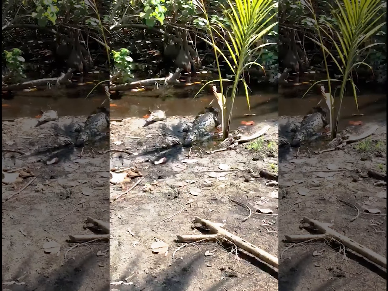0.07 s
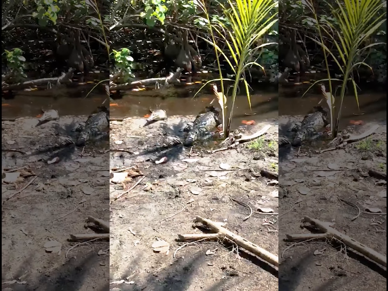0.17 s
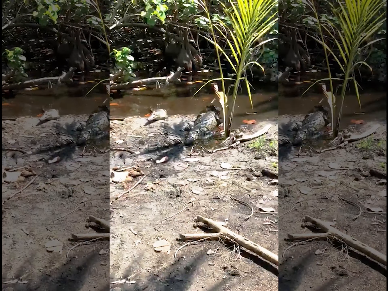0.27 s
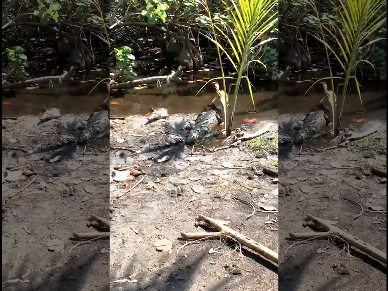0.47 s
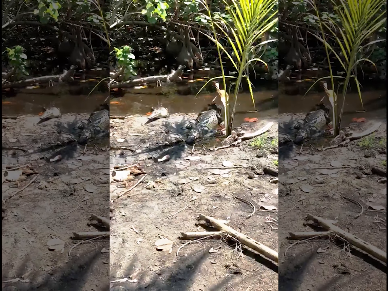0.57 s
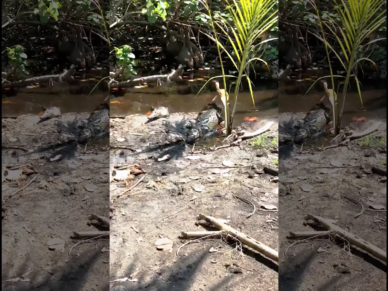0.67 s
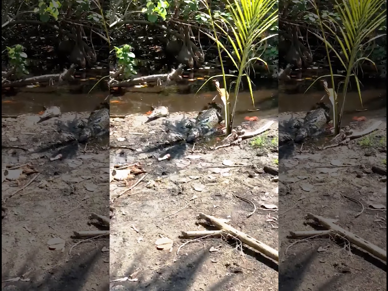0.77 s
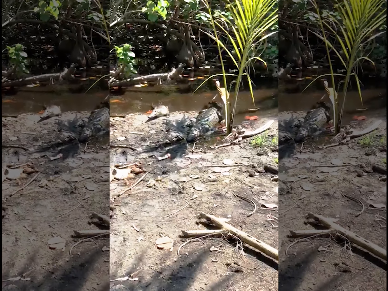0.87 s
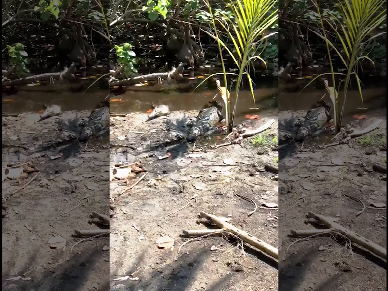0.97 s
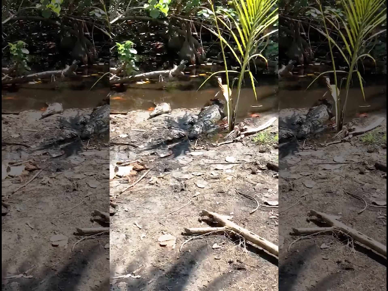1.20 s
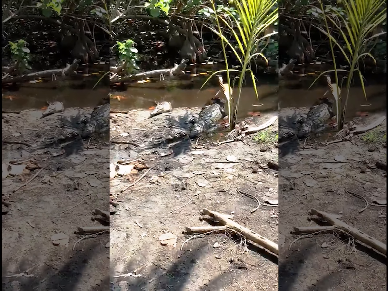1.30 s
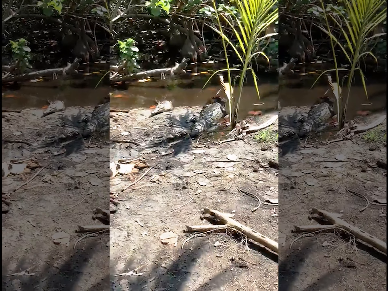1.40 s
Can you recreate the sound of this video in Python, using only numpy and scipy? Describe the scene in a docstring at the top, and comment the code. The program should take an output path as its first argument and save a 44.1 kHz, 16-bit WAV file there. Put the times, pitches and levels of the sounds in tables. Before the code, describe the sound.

A bird whistles two groups of short falling notes over faint leaf rustle and forest hiss.

```python
"""A bird by a forest creek

On a muddy creek bank a bird whistles two groups of four short falling notes; the trees answer faintly.
Between the groups comes one sharp chip, and farther off a thin, slowly sinking tone, perhaps an insect.
Dry leaves rustle once and crackle twice over a low outdoor rumble and a soft hiss."""
import sys
import numpy as np
from scipy import signal
from scipy.fft import rfft, irfft, next_fast_len
from scipy.io import wavfile
from scipy.ndimage import map_coordinates

SR = 44100
rng = np.random.default_rng(int(sys.argv[2]) if len(sys.argv) > 2 else 0)


def file_out(sig):
    """Save sig as 16-bit WAV at sys.argv[1]."""
    # one column per channel
    cols = np.atleast_2d(sig).T
    # limit, then scale
    lim = np.clip(cols, -1, 1)
    pcm = np.round(lim * 32767).astype(np.int16)
    wavfile.write(sys.argv[1], SR, pcm)


N = 63945
TIME_S = np.arange(N) / SR


def amp(db):
    """Turn decibels into a number to multiply by."""
    return 10 ** (np.asarray(db) / 20)


def unit(x):
    """Scale a sound so that its average power is 1."""
    return x / np.sqrt(np.mean(x ** 2) + 1e-20)


def value_at(points, hz):
    """Read between the rows of a frequency table, with octaves evenly spaced."""
    row_hz, values = np.transpose(points)
    return np.interp(np.log(hz + 1), np.log(row_hz + 1), values)


def curves(rows):
    """Join the rows of a time table with straight lines, one curve for each later column."""
    times, *columns = np.transpose(rows)
    return [np.interp(TIME_S, times, column) for column in columns]


def wobble(rate):
    """A smooth curve through `rate` random values a second."""
    values = rng.standard_normal(int(N * rate / SR) + 4)
    return map_coordinates(values, [TIME_S * rate])


def filtered(x, gain_at):
    """Make each frequency louder or softer by gain_at(hz)."""
    size = next_fast_len(N + SR // 2)
    return irfft(rfft(x, size) * gain_at(np.fft.rfftfreq(size, 1 / SR)), size)[:N]


def coloured(x, spectrum):
    """Give a sound a balance of bass and treble, at average power 1."""
    return unit(filtered(x, lambda hz: amp(value_at(spectrum, hz))))


def delayed(x, seconds):
    """The same sound arriving later."""
    return np.interp(TIME_S - seconds, TIME_S, x, left=0)


# How strong the rumble is from low to high: frequency_hz, relative_level_db
RUMBLE_SPECTRUM = [(12, -46), (20, -31), (57, 0), (113, 0), (163, -2.5), (263, -11.5), (393, -16),
                   (503, -18), (707, -22.5), (800, -42), (1040, -33), (1760, -120)]
# How strong the hiss is from low to high: frequency_hz, relative_level_db
HISS_SPECTRUM = [(350, -22), (600, -2), (900, -1), (1300, -0.5), (1900, -6), (2900, -4), (4200, -8),
                 (7000, -15), (10500, -18.5), (12000, -21)]

def forest_air(rumble_db=-53, easing_db_per_s=2, hiss_db=-62.5):
    """A low outdoor rumble that eases slightly, and the even hiss of the forest."""
    eased_db = easing_db_per_s * (TIME_S - N / SR / 2)
    rumble = amp(rumble_db - eased_db) * coloured(rng.standard_normal(N), RUMBLE_SPECTRUM)
    hiss = amp(hiss_db) * coloured(rng.standard_normal(N), HISS_SPECTRUM)
    return rumble + hiss


# How the rustle grows and fades: time_s, level_db
RUSTLE_LOUDNESS = [(0, -74), (.17, -64.5), (.21, -60), (.26, -64), (.335, -63.5), (.385, -56.5), (.44, -62),
                   (.468, -51), (.495, -47.5), (.512, -52), (.555, -54.5), (.605, -60), (.65, -56.5),
                   (.70, -61.5), (.76, -59.5), (.81, -64.5), (1.15, -67), (1.4, -69)]
# How strong the rustle is from low to high: frequency_hz, relative_level_db
RUSTLE_SPECTRUM = [(200, -11), (700, -6), (1800, 1.5), (4000, -1), (6600, -0.5), (8000, -3), (10500, -3.5),
                   (12000, -13.5)]

def leaf_rustle(ticks_per_s=1300, tick_db=-5.5, flicker_db=1.2):
    """Dry leaves slide: a swish with tiny ticks in it."""
    level_db, = curves(RUSTLE_LOUDNESS)
    ticks = unit((rng.random(N) < ticks_per_s / SR) * rng.standard_normal(N))
    loudness = amp(level_db + flicker_db * wobble(120))
    swish = rng.standard_normal(N) + amp(tick_db) * ticks
    return loudness * coloured(swish, RUSTLE_SPECTRUM)


# Single leaves snapping: start_s, level_db, centre_hz
LEAF_SNAPS = [(.636, -55, 2600), (.754, -55, 3100)]

def leaf_crackles(fade_s=.03, width_octaves=.6):
    """Single dry leaves snap softly as the rustle dies down, each a tiny burst of noise."""
    out = np.zeros(N)
    for start, db, centre_hz in LEAF_SNAPS:
        noise = filtered(rng.standard_normal(N),
                         lambda hz: 1 / (1 + (np.log2((hz + 1) / centre_hz) / width_octaves) ** 2))
        loudness = (TIME_S > start) * amp(db - 60 * np.abs(TIME_S - start) / fade_s)
        out += loudness * unit(noise)
    return out


# How long the forest's echo takes to fade by 60 dB: frequency_hz, fade_s
ECHO_FADE_TIMES = [(500, 0.58), (1200, 0.36), (3500, 0.35), (10000, 0.28)]

def forest_echo(x, build_s=.03):
    """Many trees send back one blurred echo; its treble dies sooner."""
    hz, t, noise = signal.stft(rng.standard_normal(SR), SR, nperseg=256)
    fade = amp(-60 * t / value_at(ECHO_FADE_TIMES, hz)[:, None])
    build_up = 1 - np.exp(-t / build_s)
    _, tail = signal.istft(noise * fade * build_up, SR, nperseg=256)
    return signal.fftconvolve(x, tail / np.linalg.norm(tail))[:N]


# Early echoes off tree trunks: delay_s, relative_level_db
TRUNK_ECHOES = [(.021, -23.5), (.041, -34)]

def among_trees(call, forest_db=-17.5):
    """A near call with its echoes from two trunks and from the wood behind."""
    trunks = sum(amp(db) * delayed(call, delay) for delay, db in TRUNK_ECHOES)
    return call + trunks + amp(forest_db) * forest_echo(call)


# The path of the thin, far tone: time_s, pitch_hz, level_db
THIN_TONE_PATH = [(.705, 3650, -72), (.73, 3625, -54.5), (.762, 3610, -63), (.782, 3578, -52),
                  (.84, 3510, -60), (.97, 3518, -56.5), (1.06, 3493, -52.5), (1.13, 3452, -60),
                  (1.197, 3422, -62), (1.215, 3420, -77)]

def thin_tone(waver_hz=11.2, flutter_db=2.6, flutters_per_s=130, octave_db=-20.5):
    """A far, fluttering tone sinks slowly and pulses as it overlaps its own echo."""
    pitch_hz, level_db = curves(THIN_TONE_PATH)
    phase = 2 * np.pi * np.cumsum(pitch_hz + waver_hz * wobble(flutters_per_s)) / SR
    loudness = amp(level_db + flutter_db * wobble(flutters_per_s))
    tone = loudness * (np.sin(phase) + amp(octave_db) * np.sin(2 * phase))
    tone *= TIME_S > THIN_TONE_PATH[0][0]  # silent before the first row
    echo = amp(db=-7) * delayed(tone, seconds=.09)
    return tone + echo + amp(db=-11.5) * forest_echo(tone)


def swell(start, length, peak=.45, rise_softness=2.07, fade_softness=1.16):
    """The loudness of one note: a soft rise to the peak and a rounded fade."""
    progress = (TIME_S - start) / length
    arch = np.interp(progress, [0, np.clip(peak, .05, .95), 1], [0, .5, 1])
    return np.abs(np.sin(np.pi * arch)) ** np.where(arch < .5, rise_softness, fade_softness)


def glide(start, length, mid_hz, hz_per_s, ease):
    """The phase (wave angle) of a sliding tone; more ease flattens the slide, then turns it back."""
    progress = np.clip((TIME_S - start) / length, 0, 2)
    from_middle = progress - .5
    pitch_hz = mid_hz + hz_per_s * length * (from_middle - ease * from_middle ** 2)
    return 2 * np.pi * np.cumsum(pitch_hz * (progress > 0)) / SR


# The two parts of the chip: start_s, length_s, mid_pitch_hz, rise_hz_per_s, level_db
CHIP_PARTS = [(0.8084, .0066, 1173, -14000, -38), (0.8115, 0.023, 1189, 4010, -35)]
# The chip's harmonics, at 1, 2 and 3 times its pitch: relative_level_db
CHIP_HARMONICS = [-13, 0, -32]

def bird_chip(rasp_radians=.73, rasp_fade_s=.0032):
    """A quick two-part call, strongest at twice its pitch and raspy at first."""
    out = np.zeros(N)
    age_s = np.maximum(TIME_S - CHIP_PARTS[0][0], 0)
    rasp = rasp_radians * np.exp(-age_s / rasp_fade_s) * wobble(1100)
    for start, length, mid_hz, rise, db in CHIP_PARTS:
        phase = glide(start, length, mid_hz, rise, ease=2.3) + rasp
        tone = sum(amp(level) * np.sin(k * phase) for k, level in enumerate(CHIP_HARMONICS, 1))
        out += amp(db) * swell(start, length) * tone
    return among_trees(out)


# The bird's eight whistled notes:
# start_s, length_s, mid_pitch_hz, fall_hz_per_s, peak_place (0 to 1), level_db, ending_level_db
WHISTLE_NOTES = [(0.18, 0.051, 1255, 4870, 0.39, -41.5, -51), (.318, 0.039, 1215, 6140, .5, -36, -51.5),
                 (0.449, 0.035, 1196, 5240, 0.68, -31, -44), (.582, 0.045, 1200, 6640, 0.67, -26, -50.5),
                 (0.841, .043, 1181, 5960, 0.84, -35, -47.5), (0.973, 0.0376, 1186, 5560, 0.89, -39, -46),
                 (1.100, .039, 1276, 7040, .5, -32, -49), (1.221, 0.042, 1303, 8330, 0.52, -30.5, -44.5)]

def bird_whistles(ending_s=.031, overlap_s=.0084):
    """Each note is a pure tone that swells as it falls, then slides on lower in a soft ending."""
    out = np.zeros(N)
    for start, length, mid_hz, fall, peak, db, ending_db in WHISTLE_NOTES:
        body = amp(db) * swell(start, length, peak)
        ending = amp(ending_db) * swell(start + length - overlap_s, ending_s)
        tone = np.sin(glide(start, length, mid_hz, -fall, ease=.1))
        out += among_trees((body + ending) * tone)
    return out


def scene():
    """All the sounds added together in one channel."""
    background = forest_air() + leaf_rustle() + leaf_crackles() + thin_tone()
    return (background + bird_chip() + bird_whistles())[None]


def record(dry):
    """Cut away the very highest treble."""
    top_hz = 12050
    return filtered(dry[0], lambda hz: hz < top_hz)[None]


dry = scene()
out = record(dry)
file_out(out)
```